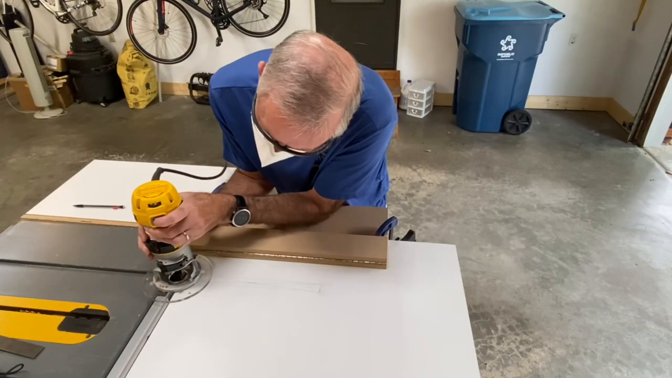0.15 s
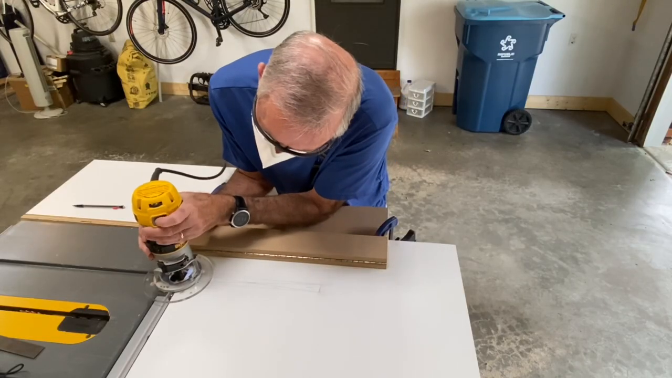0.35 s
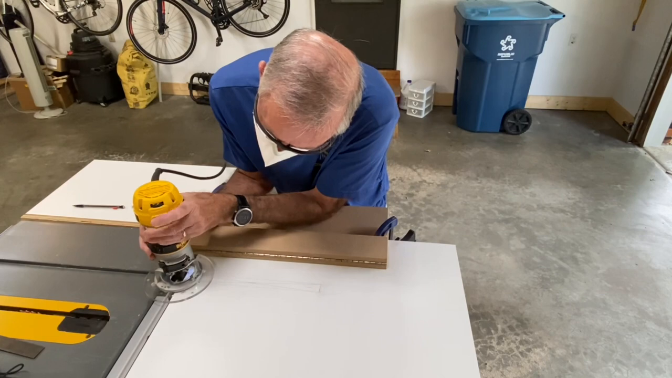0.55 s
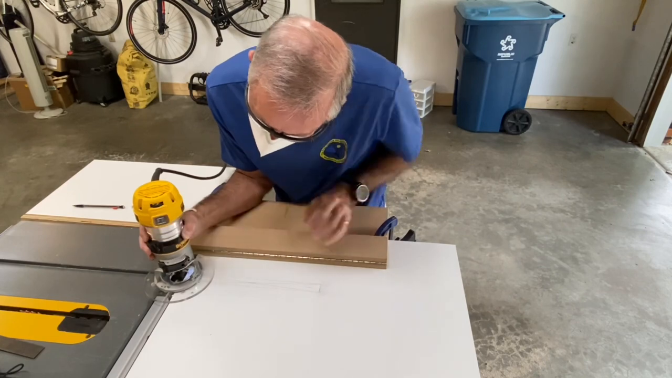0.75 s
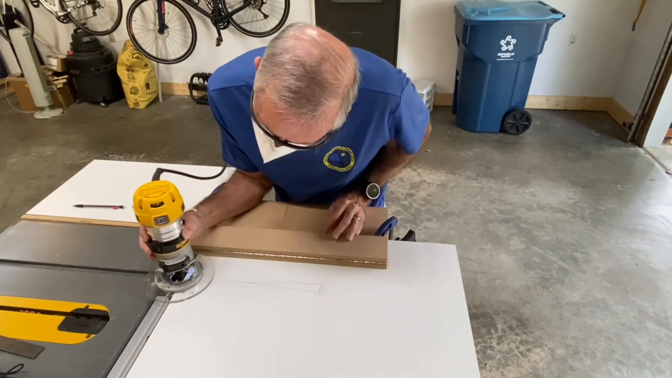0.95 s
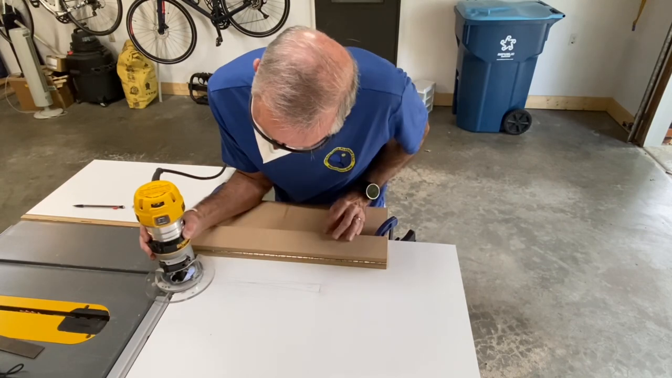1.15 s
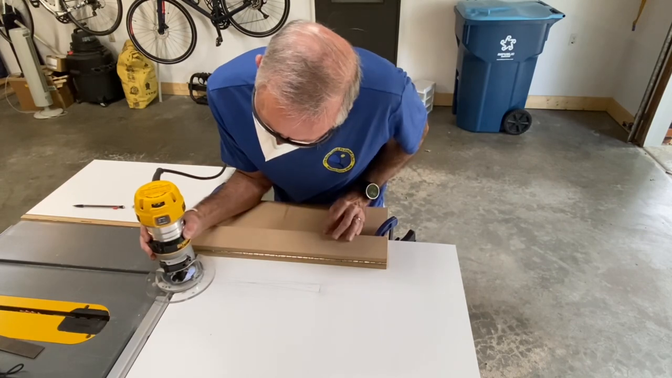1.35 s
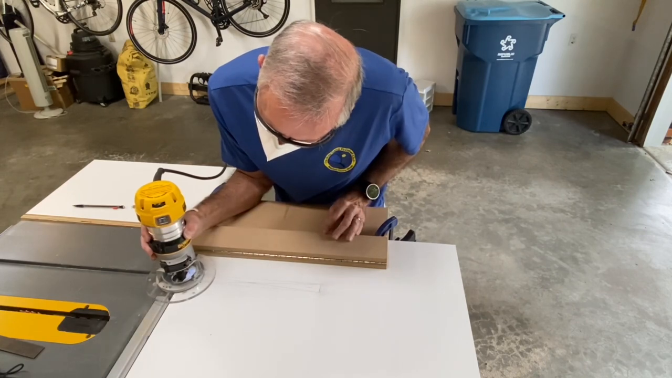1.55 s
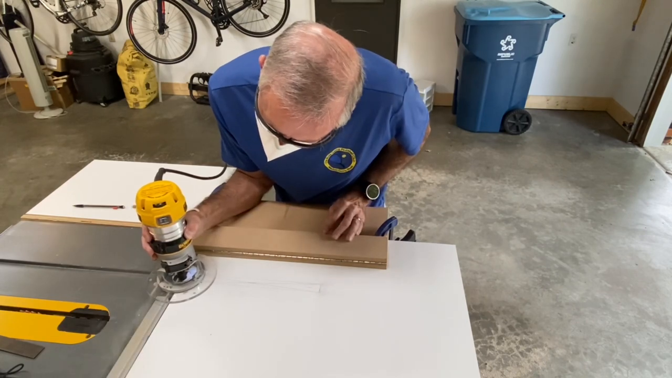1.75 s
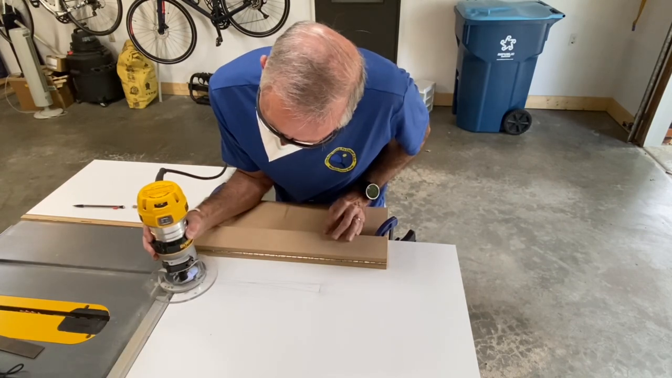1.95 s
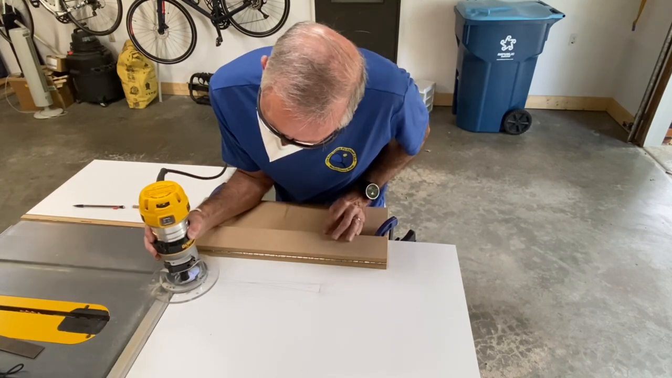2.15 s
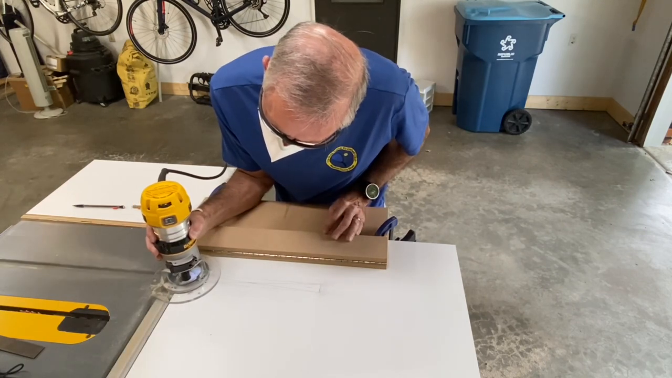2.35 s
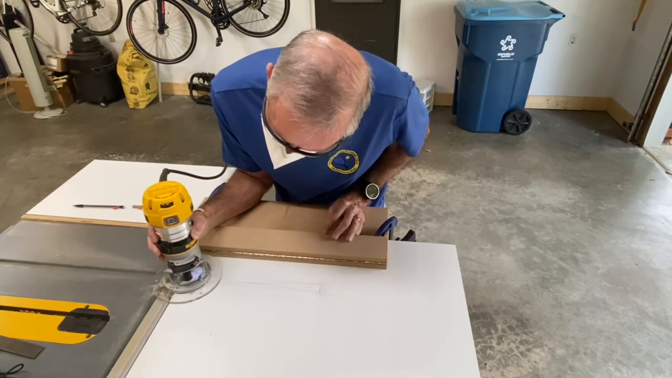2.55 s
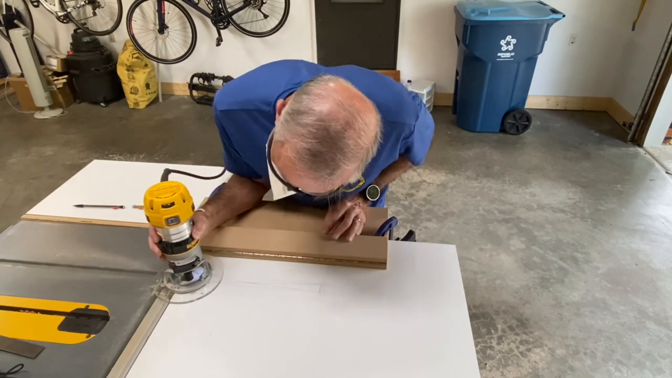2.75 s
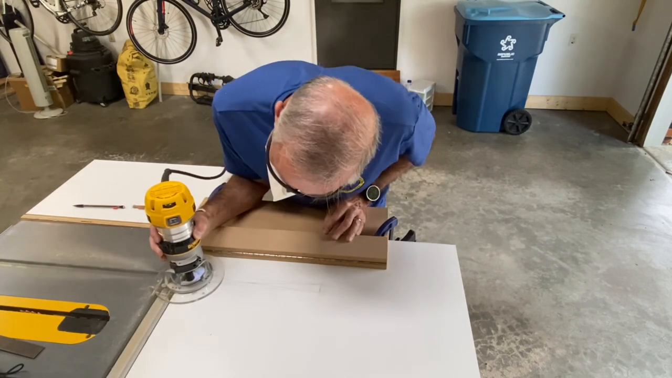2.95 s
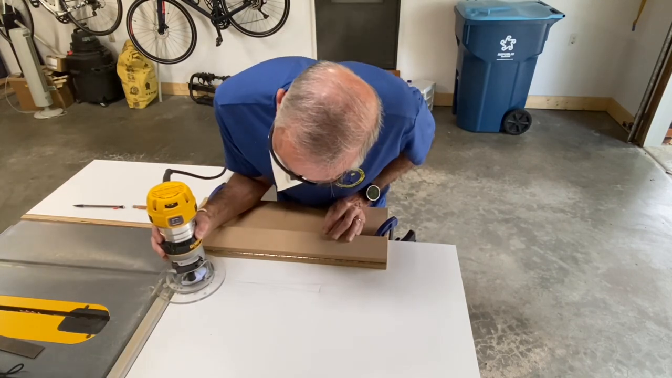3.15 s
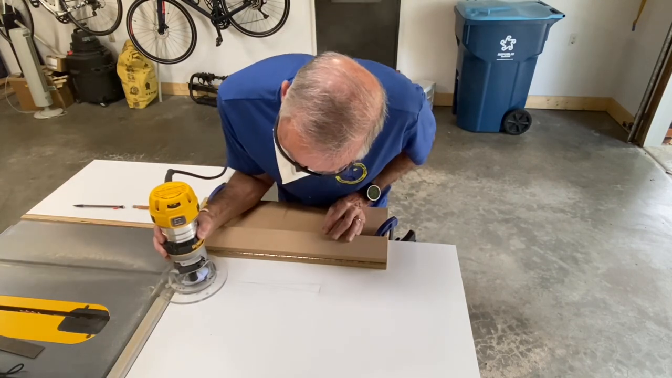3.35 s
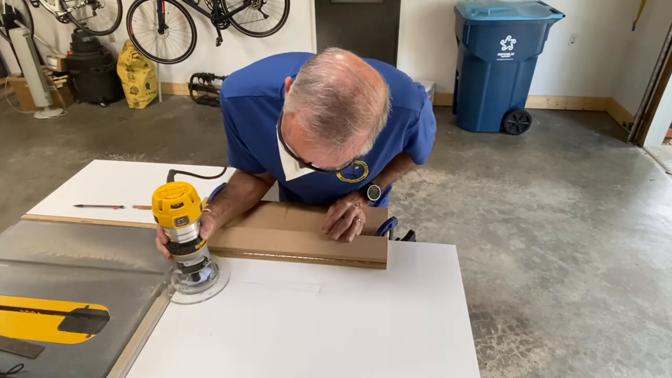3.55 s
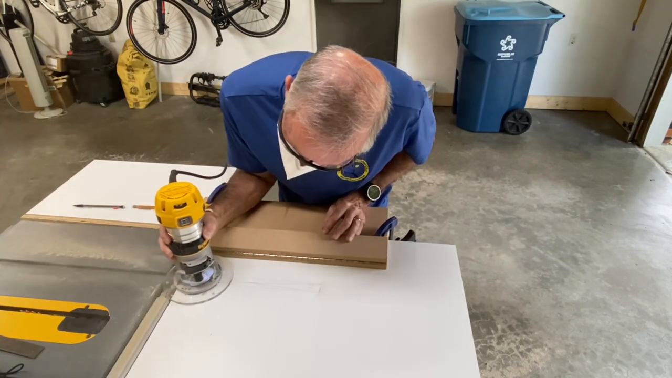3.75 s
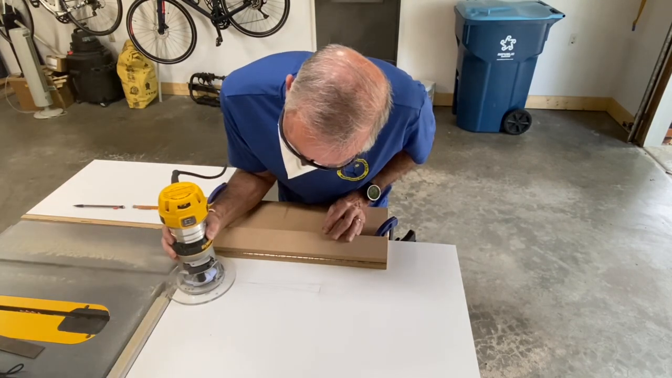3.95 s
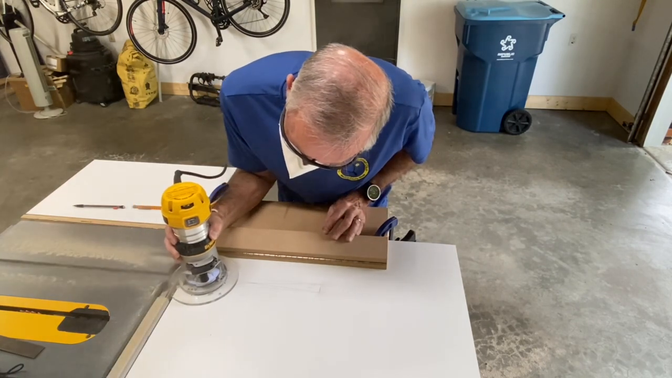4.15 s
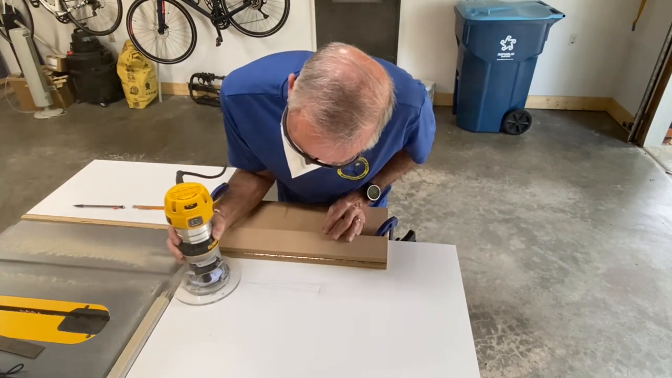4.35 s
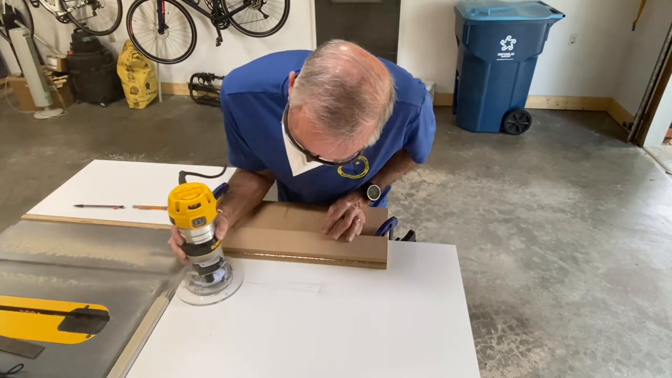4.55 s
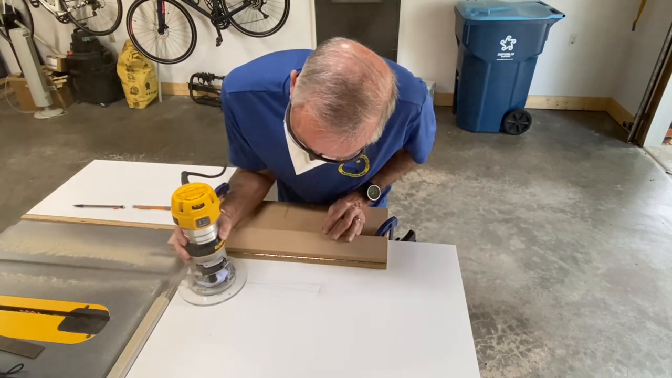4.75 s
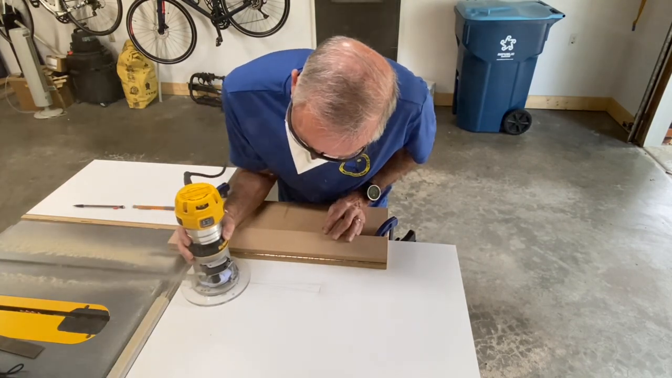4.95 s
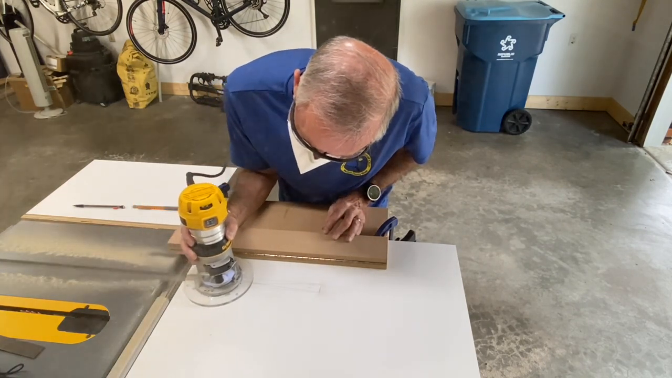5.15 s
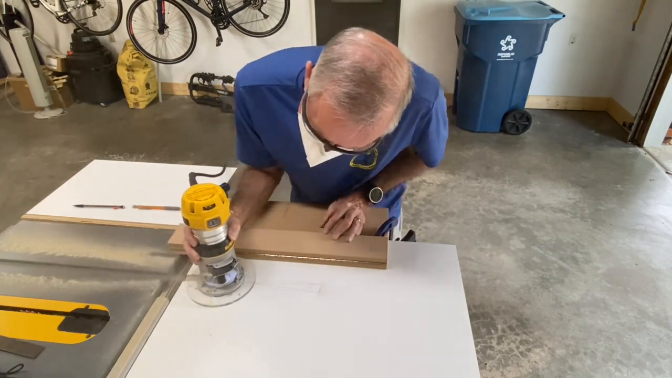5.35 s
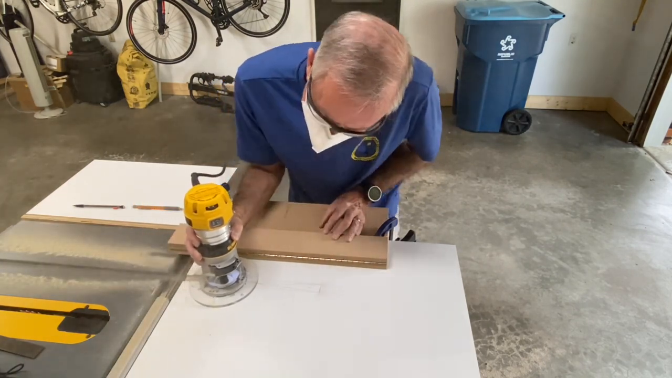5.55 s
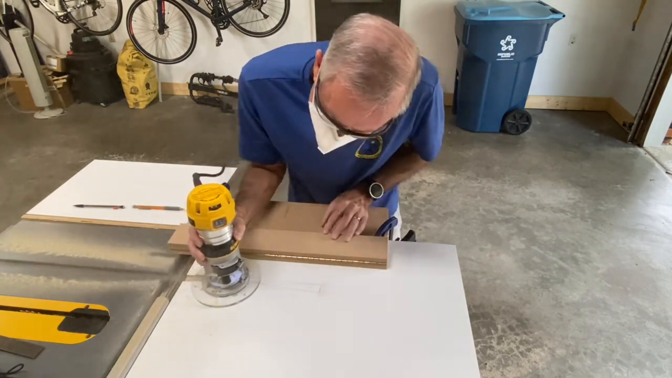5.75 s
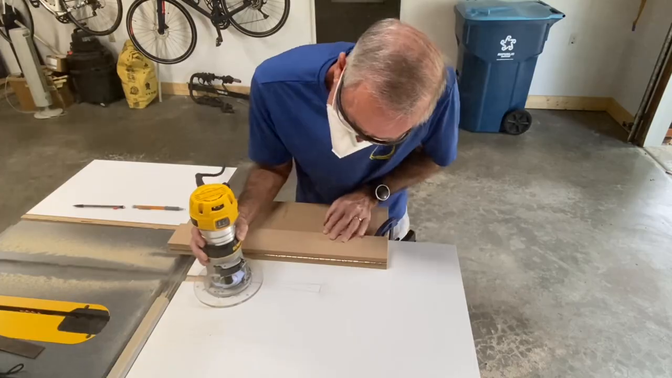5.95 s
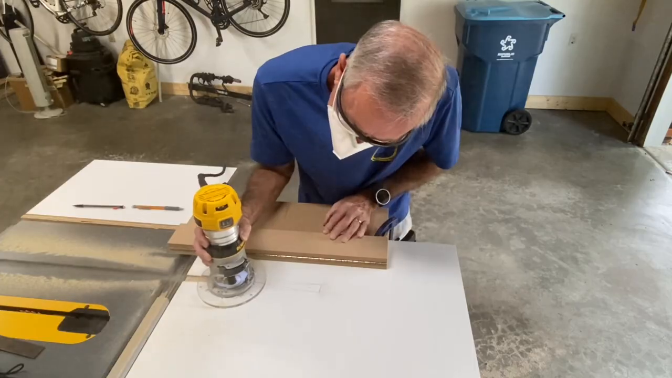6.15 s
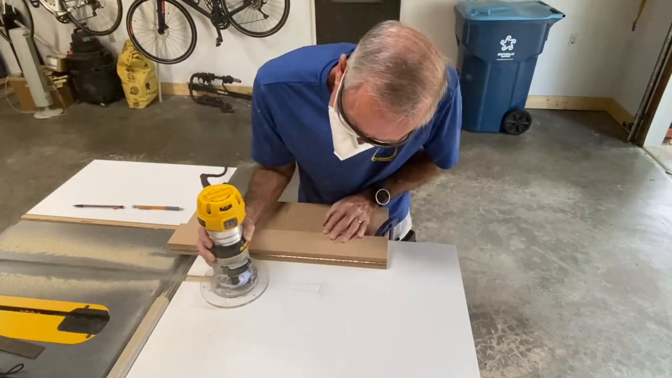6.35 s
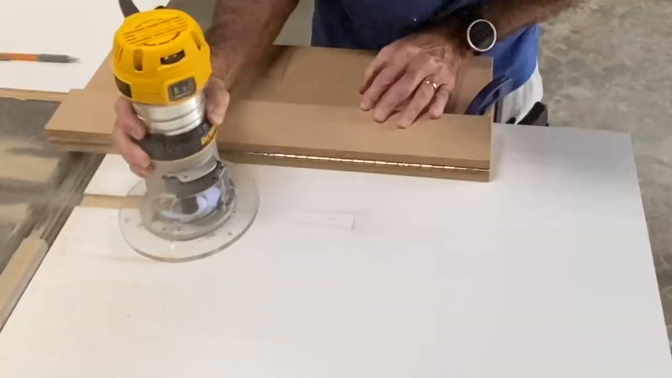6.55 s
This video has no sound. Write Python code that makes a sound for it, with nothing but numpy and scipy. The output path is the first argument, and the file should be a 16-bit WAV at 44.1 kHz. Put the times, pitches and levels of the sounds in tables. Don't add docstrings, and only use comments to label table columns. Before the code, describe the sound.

A switch clicks, a handheld router whines up in a split second, then screams steadily through a wooden top, growing rougher and near-overloadingly loud.

```python
import sys
import numpy as np
from scipy import signal
from scipy.fft import rfft, irfft, next_fast_len
from scipy.io import wavfile
from scipy.ndimage import uniform_filter1d

SR = 44100
rng = np.random.default_rng(int(sys.argv[2]) if len(sys.argv) > 2 else 0)


def master_out(mix):
    frames = np.transpose(np.atleast_2d(mix))
    ceiling = np.clip(frames, -1, 1)
    pcm = np.round(ceiling * 32767).astype(np.int16)
    wavfile.write(sys.argv[1], SR, pcm)


def to_linear_factor(level_db):
    exponent = np.asarray(level_db, float) / 20
    return 10 ** exponent


N = 291501
T = np.arange(N) / SR

# f/Hz, level/dB per Hz
SHOP_COLOUR = [(18, -40), (30, -14), (113, -3), (415, -15), (485, -16), (794, -8), (978, -15), (1560, -15),
               (6360, -38), (15000, -30.5)]
SHOP_DB = -56.5

# t/s, peak level/dB
SWITCH_CLICKS = [
    (.177, -36),
    (.1935, -19),
]
# f/Hz, width/Hz, level/dB
SWITCH_MODES = [(3160, 360, -17), (4200, 870, -6), (6500, 900, -26), (8900, 600, -17), (10700, 740, 1),
                (12900, 840, 9)]

HUM_HZ = 240
HUM_ORDERS_DB = [1.5, -9, -13, -14, -14]
HUM_DB, HUM_DB_PER_LOAD_DB = -47.5, 0.6
# t/s, half length/s, level/dB
HUM_START = [(.33, 0.056, 11.6)]
# t/s, half length/s, level/dB
HUM_DIPS = [(0.872, 0.21, -11), (3.367, .05, -9), (5.253, .08, -3), (5.97, 0.16, -17), (6.4, 0.15, -18)]

# idle level/dB, share of chip load, power of speed
NOISE_LAYERS = [
    (-39.5, .25, 0.73),
    (-26, 0.42, 1.23),
    (-32.5, .99, 1.3),
    (-26.5, 0.26, 1.7),
]
# f/Hz, level/dB per Hz
RUMBLE_COLOUR = [(20, -26), (60, -16), (120, -6), (200, -6.5), (400, 5.5), (600, 3.5), (900, 2)]
ROAR_COLOUR = [(400, -24), (650, -14), (1000, -5.5), (1400, 0.5), (1900, 0), (2800, -2.5), (3300, -7),
               (4000, -19)]
SPRAY_COLOUR = [(2600, -18), (3200, -3.5), (3650, -6.5), (4100, 0), (4700, 0), (6000, -2), (7000, -6),
                (8200, -8)]
HISS_COLOUR = [(5800, -36), (7200, -6), (9000, -4.5), (11000, -5.5), (13000, -7), (15000, -5.5),
               (17000, -16)]
# t/s, share 0-1
LEAN = [
    (2.6, 0.04),
    (2.75, 0.73),
    (2.95, 0.63),
    (3.1, 0.0084),
]
# low f/Hz, high f/Hz
LEAN_BAND = [6300, 8500]

# t/s, strike rate f/Hz, slot whine level/dB
RUN_UP = [(.235, 20, -75), (.3, 100, -56), (.34, 182, -38), (.378, 392, -29), (.4, 485, -34),
          (.44, 662, -32), (.48, 788, -38), (.52, 848, -42), (.57, 876, -52)]
# t/s, f/Hz
LOADED_SPEED = [(0.58, 1755), (0.76, 1784), (1.1, 1706), (1.72, 1687), (2.41, 1700), (2.64, 1730),
                (2.93, 1727), (3.03, 1706), (3.41, 1666), (3.75, 1712), (3.93, 1691), (4.2, 1719),
                (5.04, 1707), (5.24, 1752), (5.78, 1741), (6.03, 1699), (6.48, 1670), (6.6, 1696)]
# t/s, half length/s, shift of the second order f/Hz
NUDGES = [(.61, 0.0395, 6), (.82, .1, -10), (1.1, 0.11, 8), (1.97, 0.079, -13), (2.35, 0.055, 6),
          (2.76, 0.071, 9), (3.34, .07, 9), (3.47, 0.037, -12), (3.57, 0.035, 12), (4.28, 0.063, 12),
          (4.44, .06, -10), (4.96, 0.057, -10), (5.12, .08, 7), (5.48, 0.0488, -11), (5.68, .1, -8),
          (5.82, .04, 9), (6.08, 0.031, -11), (6.32, .14, 12), (6.48, 0.029, -9)]
# f/Hz, width/Hz, level/dB
HOUSING = [(1200, 500, 0), (2100, 500, 1), (4680, 260, 13), (7300, 900, 3), (14500, 1500, 7)]
# t/s, level/dB
BRUSHES = [(.23, -58), (.3, -53), (.39, -41), (.45, -52), (.6, -70)]
SLOT_DB, BLADE_DB, RING_DB, EDGE_DB = -44, -34.5, -44.5, -31.5
# t/s, half length/s, level/dB
BLADE_SWELLS = [(.87, .12, -7), (1.5, 0.58, 2.5), (3.05, .25, 4), (4.8, .4, -1), (5.35, .15, 5),
                (5.85, 0.13, -3), (6.25, .2, 6)]
# t/s, half length/s, level/dB
ENTRY = [(1.45, 0.3, 8)]
# order, level/dB
EDGE_ORDERS = [(8, -7), (9, -6), (10, -2), (11, -11), (14, -9), (15, -14), (16, -13), (17, -13), (18, -16)]

# t/s, offset below each order f/Hz, board shake level/dB, bit shake level/dB
CHATTER = [(1.5, 237.4, -43, -36), (1.7, 241, -25.5, -26), (2.1, 214.3, -30.5, -23),
           (2.55, 203.5, -24.5, -23.5), (2.8, 183.3, -21.5, -21.5), (3.15, 205, -26, -21),
           (3.3, 190.4, -24, -21), (3.45, 237.7, -26, -23), (3.75, 223.6, -23, -20.5),
           (3.9, 239.8, -22.5, -18), (4.2, 212, -21.5, -21.5), (4.35, 238.1, -20.5, -20),
           (4.5, 211.8, -20, -20.5), (4.65, 241, -18, -21.5), (5.6, 239.4, -18, -24.5),
           (5.85, 221, -18.5, -22.5), (6.05, 240, -25, -32), (6.6, 242.7, -27, -38)]
# order, curve (0 board, 1 bit, 2 fine), level/dB, level/dB at twice the offset
CHATTER_ORDERS = [(1, 0, -10.5, -30), (2, 0, -1, -18), (3, 0, -7, -22), (4, 1, -1, -14), (5, 1, -4, -14),
                  (6, 2, -1, -11), (7, 2, -7, -14), (8, 2, -13, -20), (9, 2, -13, -22), (10, 2, -12, -22),
                  (12, 2, -15, -20), (15, 2, -17, -22)]
FINE_CHATTER_DB, FINE_LATE_DB = -22.5, -8
# order, t/s, half length/s, level/dB
SHAKES = [(4, 3.45, 0.28, 5), (6, 2.3, 0.17, 0.5), (6, 3.37, 0.21, 2), (5, 6.05, 0.19, 7),
          (3, 5.49, 0.22, -0.5), (4, 2.5, 0.39, -3)]
# order, t/s, half length/s, level/dB
DOUBLE_SHAKES = [(5, 5.53, 0.54, 9)]

# t/s, then level/dB of table drumming, bite, edge sharpness, bit flex and chip load
CUT = [(.55, -27.5, -23, -38, -53, -0.5), (1.0, -28, -27, -35, -36.5, 2.5),
       (1.3, -24, -18.5, -30, -28, 0.5), (1.52, -31, -12, -23, -14.5, 4.5), (1.75, -42, -14.5, -22, -13, 5),
       (2.05, -32.5, -18, -23, -26, 9.5), (2.35, -28.5, -13, -37, -22, 10.5),
       (2.8, -24, -15, -22, -31, 6.5), (3.15, -24.5, -15.5, -23.5, -33, 12.5),
       (3.4, -21.5, -17, -18.5, -23, 14), (3.7, -18.5, -12.5, -20.5, -23, 13),
       (4.0, -18, -15, -19.5, -24, 14), (4.45, -16.5, -11.5, -19.5, -32, 15),
       (4.9, -15, -8, -23.5, -29, 14), (5.2, -16.5, -11, -26.5, -38, 12), (5.65, -15.5, -11, -27, -17, 12),
       (6.0, -19.5, -7.5, -15.5, -19, 15), (6.6, -22.5, -6, -15, -15, 14)]
# level/dB when their control is at -25 dB, share of its swing
THIRD = (-22.5, 0.39)
FOURTH = (-29, 0.75)
FIFTH = (-25.5, 1)
SIXTH = (-27, 1)
RUN_UP_POWER = 2.2
TOUCH_S, UNTOUCHED_DB = .93, -14
# order, t/s, half length/s, level/dB
ACCENTS = [(3, 5.2, 0.22, -15), (3, 5.85, 0.13, -13), (4, 1.11, 0.23, 10), (4, 1.42, 0.066, -14),
           (4, 2, 0.19, -11), (4, 3.74, 0.089, -15), (4, 13, 0.11, -8), (4, 4.78, 0.084, 12.5),
           (4, 6.1, 0.094, -10), (4, 5.72, 0.058, 9), (5, 1.07, 0.078, -12), (5, 2.585, 0.13, 4),
           (5, 3.35, 0.16, 3), (5, 5.4, 0.088, 7), (5, 5.65, 0.11, -21), (6, 5.8, .12, -7),
           (1, 0.44, 0.049, -3), (2, 0.48, 0.054, -1.5), (7, 3.37, 0.28, 8), (7, 6.25, 0.32, -13),
           (12, 3.1, 0.095, 3), (12, 2.27, 0.19, 1), (12, 1.56, 0.085, -5)]


def curves(table):
    s, *columns = np.transpose(table)
    return [np.interp(T, s, c) for c in columns]


def ramp(start_s, length_s):
    return np.clip((T - start_s) / length_s, 0, 1)


def before(end_s, length_s):
    return np.clip((end_s - T) / length_s, 0, 1)


def swells(rows):
    return sum(height * np.exp(-((T - s) / half_s) ** 2) for s, half_s, height in rows)


def accents(order, table=ACCENTS):
    return swells([row[1:] for row in table if row[0] == order])


def speed_db(hz):
    return 20 * np.log10(np.clip(hz / 800, .01, 1))


def walk(rate, t=T):
    steps = np.arange(0, N / SR * rate + 2, .25)
    levels = np.repeat(rng.standard_normal(len(steps) // 4 + 1), 4)
    levels = uniform_filter1d(uniform_filter1d(levels, size=4), size=4)
    return 1.3 * np.interp(t * rate, steps, levels[:len(steps)])


def coloured(x, spectrum):
    hz, db = np.transpose(spectrum)
    size = next_fast_len(N)
    bins_hz = np.arange(size // 2 + 1) * SR / size
    gain = to_linear_factor(np.interp(np.log(bins_hz + 1), np.log(hz), db, left=-90, right=-90))
    y = irfft(rfft(x, size) * gain, size)[:N]
    return y / np.std(y)


def tone(turns, db, wobble_db, rate):
    gain = np.repeat(to_linear_factor(db[::8] + wobble_db * walk(rate, T[::8])), 8)[:N]
    phase = .17 * rng.standard_normal()
    return np.sqrt(2) * gain * np.cos(2 * np.pi * (turns + phase))


def peak(hz, centre_hz, width_hz):
    return 1 / np.sqrt(1 + (2 * (hz - centre_hz) / width_hz) ** 2)


def shop():
    return to_linear_factor(SHOP_DB) * coloured(rng.standard_normal(N), SHOP_COLOUR)


def concrete(airborne):
    t = np.arange(int(.4 * SR)) / SR
    decay = np.exp(-np.log(1000) * t / 0.28)
    tail = uniform_filter1d(rng.standard_normal(len(t)), size=3) * decay * (t > .006)
    return to_linear_factor(-15) * signal.fftconvolve(airborne, tail / np.linalg.norm(tail))[:N]


def thud():
    t = np.clip(T - .885, 0, 1)
    return to_linear_factor(-33.0) * np.sin(2 * np.pi * 72 * t) * t / 0.013 * np.exp(-t / 0.0125)


def switch():
    out, t = np.zeros(N), np.arange(900) / SR
    highpass = signal.butter(2, 2000, "highpass", fs=SR, output="sos")
    for s, db in SWITCH_CLICKS:
        ring = 0
        for f_hz, w_hz, g_db in SWITCH_MODES:
            ring = ring + to_linear_factor(g_db) * np.exp(-np.pi * w_hz * t) * np.sin(2 * np.pi * f_hz * t)
        blow = rng.standard_normal(len(t)) * np.exp(-t / 0.00057)
        ring = signal.sosfilt(highpass, np.convolve(ring, blow)[:len(t)])
        start = int(s * SR)
        out[start:start + len(t)] += to_linear_factor(db) * ring / np.abs(ring).max()
    return out


def hum(mains):
    load = curves(CUT)[4]
    fade_db = -8 * ramp(.36, 0.11)
    level_db = HUM_DB + HUM_DB_PER_LOAD_DB * load + swells(HUM_START + HUM_DIPS) - 25 * before(.29, 0.025)
    out = 0
    for k, db in enumerate(HUM_ORDERS_DB):
        out = out + tone((k + 1) * mains, level_db + db + fade_db * min(k, 1), wobble_db=1, rate=8)
    return out


def noises(hz, turns, mains):
    load, lean = curves(CUT)[4], curves(LEAN)[0]
    strike = np.exp(.5 * (hz / 850) ** 2 * np.cos(2 * np.pi * turns))
    spark = np.exp(.17 * np.cos(2 * np.pi * mains))
    feed = walk(5.5)
    levels = [db + share * load + power * speed_db(hz) for db, share, power in NOISE_LAYERS]
    levels[3] = levels[3] + 3 * lean - .5 * swells(ENTRY)
    colours = (RUMBLE_COLOUR, ROAR_COLOUR, SPRAY_COLOUR, HISS_COLOUR)
    gates = (spark, 1, strike * spark, strike * spark)
    out = 0
    for db, colour, gate, grit_db in zip(levels, colours, gates, (0, 0, 1.3, .7)):
        grains = rng.standard_normal(N) * to_linear_factor(grit_db * walk(1500)) * gate
        out = out + to_linear_factor(db + .4 * feed + .8 * walk(14)) * coloured(grains, colour)
    band = signal.butter(2, LEAN_BAND, "bandpass", fs=SR, output="sos")
    return out - lean * signal.sosfiltfilt(band, out)


def slot_whine(hz, turns, slot_up_db, throb):
    out = 0
    for k, db in enumerate((0, -11, -15)):
        order = 12 * (k + 1)
        line_hz = order * hz
        body = .3 + sum(to_linear_factor(g_db) * peak(line_hz, f_hz, w_hz) for f_hz, w_hz, g_db in HOUSING)
        slots = tone(order * turns, slot_up_db + db, wobble_db=1, rate=20)
        out = out + throb * body * slots * (line_hz < 17000) * (T < .6)
    return out


def brushes(throb):
    sparks = rng.standard_normal(N) * throb
    level_db = curves(BRUSHES)[0]
    out = 0
    for f_hz, w_hz, g_db in HOUSING[:4]:
        ring = signal.lfilter(*signal.iirpeak(f_hz, f_hz / (w_hz + 250), SR), sparks)
        out = out + 2 * to_linear_factor(level_db + g_db / 3) * ring
    return out


def motor(hz, turns, mains, slot_up_db, biting):
    _, _, edge, _, load = curves(CUT)
    lean, entry = curves(LEAN)[0], swells(ENTRY)
    blade_db = BLADE_DB + swells(BLADE_SWELLS)
    slot_db = SLOT_DB + 14 * lean + entry + 0.39 * load + accents(12)
    ring_db = RING_DB + 1.3 * load + 1.55 * entry + accents(7)
    edge_db = EDGE_DB + 0.57 * (edge + 25) + entry - 11 * lean - 6 * before(1.2, 0.33)
    shaken = turns + .016 * biting * walk(120)
    lines = 0
    for order, db in ((13, blade_db), (12, slot_db), (7, ring_db)):
        lines = lines + tone(order * shaken, db, wobble_db=2, rate=15)
    for order, db in EDGE_ORDERS:
        lines = lines + tone(order * shaken, edge_db + db - 3 * biting, wobble_db=2.5, rate=6)
    throb = np.exp(1.3 * (np.cos(2 * np.pi * mains) - 1)) * 2.1
    return ramp(.46, 0.026) * lines + slot_whine(hz, turns, slot_up_db, throb) + brushes(throb)


def chatter(turns, biting):
    offset_hz, *db = curves(CHATTER)
    db.append(FINE_CHATTER_DB + FINE_LATE_DB * before(1.9, 0.6))
    slip = np.cumsum(offset_hz + 3 * walk(20) + 8 * walk(110)) / SR
    out = 0
    for k, c, first_db, second_db in CHATTER_ORDERS:
        single_db = db[c] + first_db + accents(k, SHAKES)
        double_db = db[c] + second_db + accents(k, DOUBLE_SHAKES)
        above_db = db[c] + second_db + 0.37
        out = out + tone(k * turns - slip, single_db, wobble_db=2.5, rate=60)
        out = out + tone(k * turns - 2 * slip, double_db, wobble_db=5.0, rate=73)
        out = out + tone((k - 1) * turns + slip, above_db, wobble_db=4.0, rate=76)
    return biting * out


def cutter(hz, turns):
    late_db = 1.5 * before(.6, .1)
    drum, bite, edge, flex, _ = curves(CUT)
    orders = [drum, bite]
    for (db, share), control in ((THIRD, flex), (FOURTH, edge), (FIFTH, edge), (SIXTH, flex)):
        orders.append(db + share * (control + 25))
    orders[3] = orders[3] + UNTOUCHED_DB * before(TOUCH_S, .02)
    out = 0
    for k, db in enumerate(orders):
        level_db = db + RUN_UP_POWER * speed_db(hz) + accents(k + 1) - k * late_db
        out = out + tone((k + 1) * turns, level_db, wobble_db=.7 + .35 * k, rate=14)
    return out


def scene():
    up_hz, slot_up_db = curves(RUN_UP)
    loaded_hz = (curves(LOADED_SPEED)[0] + swells(NUDGES)) / 2
    running = ramp(.55, .04)
    hz = uniform_filter1d((1 - running) * up_hz + running * loaded_hz, size=900)
    turns = np.cumsum(hz * (1 + .0012 * walk(25))) / SR
    mains = HUM_HZ * T
    powered, biting = ramp(.228, 0.021), ramp(1.5, 0.62)
    machine = motor(hz, turns, mains, slot_up_db, biting) + noises(hz, turns, mains)
    airborne = powered * machine + switch() + thud()
    cut = cutter(hz, turns) + chatter(turns, np.sqrt(biting)) + hum(mains)
    mono = shop() + concrete(airborne) + airborne + powered * cut
    return np.array([mono, mono])


def roll_off(x):
    return signal.sosfilt(signal.butter(12, 15710, fs=SR, output="sos"), x)


def record(dry):
    squeezed = dry / (1 + np.abs(dry / .99) ** 8) ** (1 / 8)
    return roll_off(squeezed)


dry = scene()
out = record(dry)
master_out(out)
```